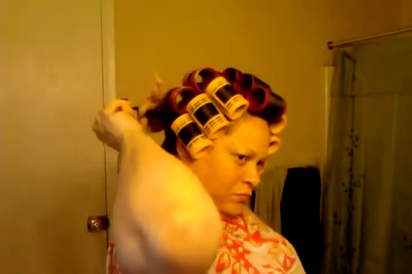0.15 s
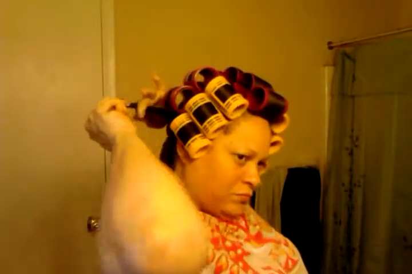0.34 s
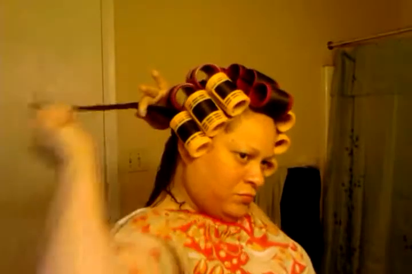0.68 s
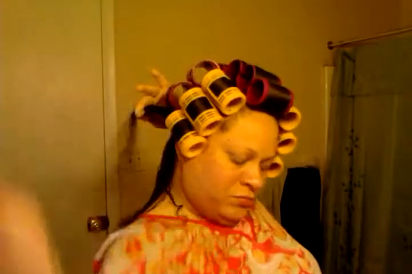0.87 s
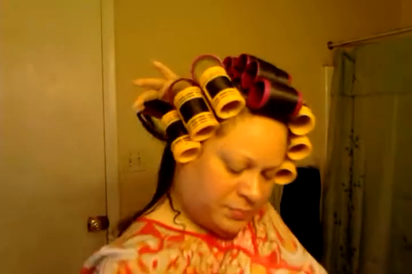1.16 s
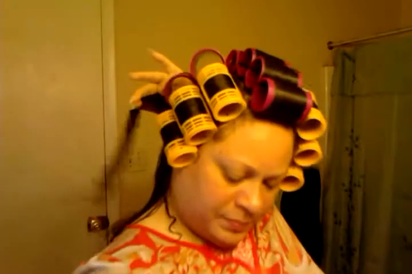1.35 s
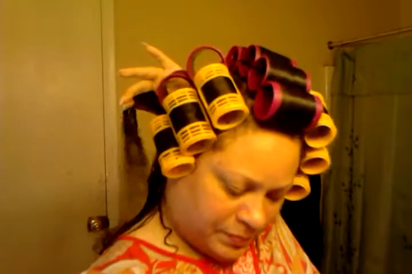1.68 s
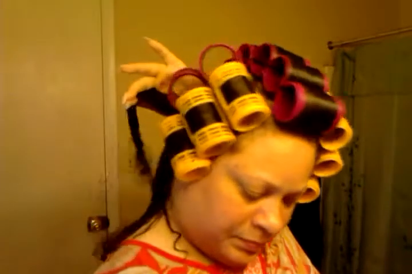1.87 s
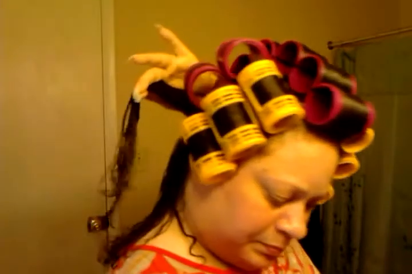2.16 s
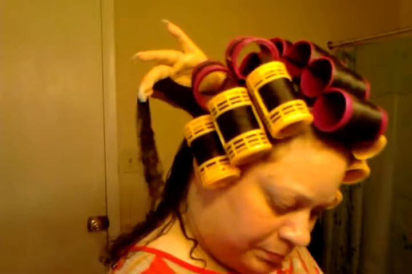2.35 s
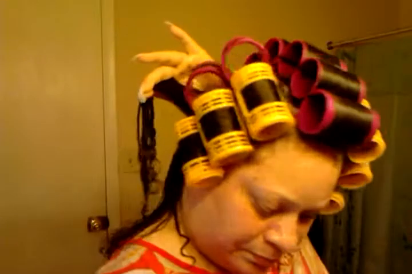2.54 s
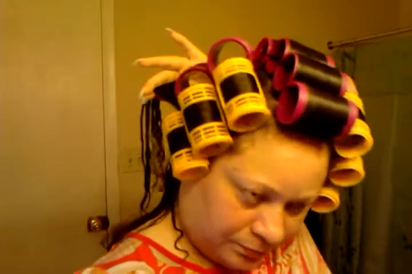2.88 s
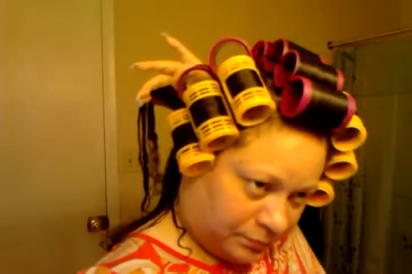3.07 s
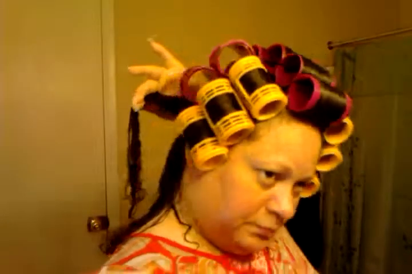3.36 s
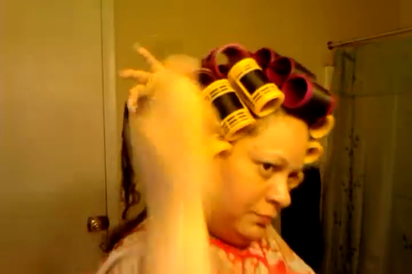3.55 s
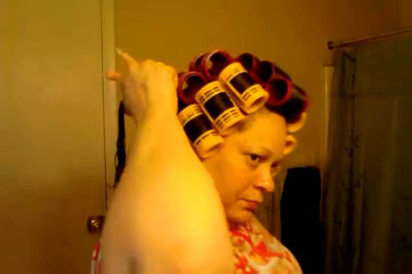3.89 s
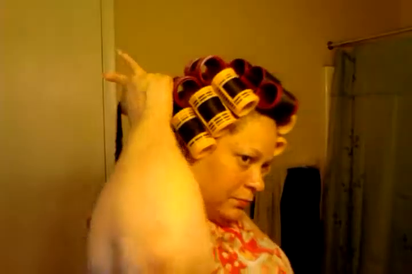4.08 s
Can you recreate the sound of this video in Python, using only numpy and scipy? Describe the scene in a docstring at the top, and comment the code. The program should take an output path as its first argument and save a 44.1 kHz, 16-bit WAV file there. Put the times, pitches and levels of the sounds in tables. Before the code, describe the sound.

A soft recorder hiss runs throughout, with a thin, very high electronic whine and faint rapid ticking. At the start a faint low rumble swells once, and small electric pops sound at about 0.2 and 0.5 seconds. From 1.3 seconds a hand rummages among plastic hair rollers and a comb on a bathroom counter: dry scraping mixed with quick clusters of small, hollow knocks. The clatter is loudest from 1.8 to 2 seconds. A roller squeaks briefly at 2.1 seconds, more rubbing and clicking follows, and another electric pop comes at 2.5 seconds. Softer scattered taps continue, and a barely audible hum comes and goes just after 3 seconds. The rummaging ends with two clusters of light, high clicks at about 3.6 and 3.8 seconds. The tiled room gives the plastic sounds a short, bright reverberation.

```python
"""From the start a recorder hisses, whines thinly and ticks; a low rumble swells once and two pops sound.
After 1.3 s a hand rummages among plastic rollers and a comb on a bathroom counter: friction and bursts
of tiny impacts excite the modes of the plastic, and the tiles add a short bright reverberation.
A roller squeaks at 2.1 s and one more electric pop follows. Near 3 s a faint hum comes and goes,
and the rummaging ends in light, high clicks."""
import sys
import numpy as np
from scipy import signal
from scipy.io import wavfile
from scipy.ndimage import uniform_filter1d

SR = 44100
rng = np.random.default_rng(int(sys.argv[2]) if len(sys.argv) > 2 else 0)


def dump(signal):
    """Clip the signal to [-1, 1] and save it as 16-bit WAV at the path in sys.argv[1]."""
    limited = np.clip(np.atleast_2d(signal).T, -1, 1)
    pcm = np.round(limited * 32767).astype(np.int16)
    wavfile.write(sys.argv[1], SR, pcm)


N = 186366

# Spectral shape of the input-stage noise: f/Hz, relative density/dB
HISS_SPECTRUM = [(12, 8.5), (20, 3.5), (319, -7), (660, -13.5), (849, -12), (1260, -15.5), (1960, -16.5),
                 (7310, -22), (9400, -22), (10200, -17.5), (11800, -23), (12800, -20.5), (16000, -23.5)]
# Drift of the electronic whine: t/s, f/Hz
WHINE_PITCH = [(0, 10196), (.3, 10198), (.6, 10195), (.9, 10196), (1.1, 10191.5), (1.4, 10193),
               (2.7, 10195.5), (2.95, 10190), (3.2, 10196), (3.5, 10198), (4.3, 10197)]
# Electric pops: t/s, signed step height/1, rise constant/s, fall constant/s
ELECTRIC_POPS = [(.2155, 0.0017, .0006, 0.00087), (0.216, 0.037, 0.0011, 0.0067),
                 (.499, -0.03, 0.00014, 0.0004), (2.499, -0.025, 0.00018, 0.00055)]
# Strokes of plastic on plastic: peak t/s, level/dB, rise/s, fall/s, brightness/dB
STROKES = [(1.346, -55, 0.083, 0.057, -3), (1.45, -44.5, 0.11, 0.12, -0.5), (1.79, -37, .03, 0.094, -3),
           (1.885, -47, 0.11, .09, 1), (1.936, -38.5, .012, 0.13, -1.5), (2.183, -42, 0.0051, 0.059, 2.5),
           (2.219, -45.5, 0.077, 0.082, -1), (2.39, -50.5, 0.096, 0.058, 0),
           (2.745, -58.5, 0.011, 0.035, 3.5), (2.955, -57.5, 0.063, 0.037, 2), (3.02, -68.5, 0.053, .05, 6),
           (3.36, -72.5, .04, 0.1, -6), (3.62, -53, .03, 0.041, 8), (3.775, -56, 0.028, 0.067, 7)]
# Modes of the rollers and comb: f/Hz, level/dB, T60/s
PLASTIC_MODES = [(155, -14, 0.073), (219.3, -2, 0.15), (290, -5.5, 0.035), (417.6, 1, 0.17),
                 (790, -18, 0.014), (980, -46, 0.012), (1313, -8, 0.024), (1498, -4, 0.024),
                 (1669, -1.5, 0.031), (2020, 11.5, 0.0098), (2580, 13.5, 0.008), (3220, -8, .015),
                 (3420, -37, 0.011), (4375, -14, 0.016), (5600, 0, 0.0069), (6200, 13, 0.0055),
                 (7060, -23, 0.032), (8850, -17, 0.045), (9250, -13.5, 0.076), (11000, -4, 0.012),
                 (12400, 10.5, 0.019), (13600, 14, .007)]
# Knocks: t/s, crack level/dB, favoured f/Hz, then relative to the crack: ring/dB, body/dB, treble/dB
PLASTIC_KNOCKS = [(1.381, -42.5, 1270, -14, -3.5, -7), (1.397, -32.5, 2580, -17, 2.5, -17),
                  (1.403, -30.5, 6200, -12, -1.5, -3), (1.4192, -26, 2580, -7, -24, -2),
                  (1.438, -28.5, 2580, -7, -29, 1.5), (1.446, -36, 4340, -7, 6.5, -5),
                  (1.483, -32, 1270, -4, -21, 0.5), (1.5, -40, 1250, -3.5, -1, -11),
                  (1.7707, -34, 8850, 3, -2, 11.5), (1.7868, -20.5, 1270, -7, -10, -10),
                  (1.806, -29.5, 1380, -2, -5.5, -9), (1.821, -24.5, 1690, -6, -3.5, -5),
                  (1.871, -24, 12400, -13, -4.5, -4), (1.8897, -28.5, 1730, -7, -4.5, -6),
                  (1.9, -35, 8850, 6.5, -8, 3.5), (1.931, -23, 1360, -12.5, -5.5, -10),
                  (1.958, -36, 1700, -3.5, -15, 5.5), (1.972, -37, 2020, 1.5, -4, -7),
                  (2.18, -43, 5600, 12, -38, 12), (2.2349, -35.5, 980, -16.5, -1.5, 2),
                  (2.3107, -37.5, 11000, -1, 3, 2.5), (2.3322, -30.5, 9250, 1.5, -6.5, 3),
                  (2.344, -50, 2020, 8, 5, 10), (2.352, -39.5, 4300, -5, -2, 8.5),
                  (2.7369, -52.5, 13600, 2, -12, 6), (2.862, -41, 1770, -8.5, -28, -5),
                  (3.0093, -46.5, 11000, -14, -21, 4.5), (3.331, -60, 300, 1, -17, -7),
                  (3.348, -50, 2020, -10, -16, -16), (3.596, -48, 8850, -13, -21, 7),
                  (3.606, -43.5, 6200, 4, -11.5, 10.5), (3.614, -40.5, 6200, -17, -20, 13),
                  (3.626, -42, 12400, -15, -25, 7), (3.635, -46, 8850, -6, -21, 5),
                  (3.749, -49, 11000, -15, -8, 11.5), (3.758, -50.5, 13600, -15, -16, 13.5),
                  (3.765, -53, 9250, 7, -15, 14), (3.777, -56.5, 8850, -10, -7, 20.5),
                  (3.858, -51.5, 8850, -19, -2, 6.5)]
# Reverberation time of the tiled room: f/Hz, T60/s
ROOM_DECAY = [(150, 0.49), (400, 0.59), (800, 0.5), (2000, 0.38), (5500, 0.4), (11000, 0.26), (15000, 0.25)]


def amp(db):
    """Amplitude ratio of a level: tenfold for every 20 dB."""
    return 10 ** (np.asarray(db) / 20)


def unit_rms(x):
    """Normalisation to unit mean power."""
    return x / np.sqrt(np.mean(x ** 2) + 1e-20)


def at_frequency(points, hz):
    """Interpolation on a logarithmic frequency axis."""
    f, value = np.transpose(points)
    return np.interp(np.log(hz + 1), np.log(f + 1), value)


def add(mix, start, sound):
    """Superposition: a sound joins the mix at its start time."""
    part = mix[round(start * SR):][:len(sound)]
    part += sound[:len(part)]


def coloured(x, spectrum):
    """Minimum-phase filtering by a spectrum of f/Hz, gain/dB."""
    log_gain = at_frequency(spectrum, abs(np.fft.fftfreq(4096, 1 / SR))) * np.log(10) / 20
    response = np.exp(np.conj(signal.hilbert(log_gain)))
    return signal.oaconvolve(x, np.fft.ifft(response).real[:2048])[:len(x)]


def hiss(level_db=-63.5):
    """Gaussian noise of the input stage, its spectral density faintly patchy in time and frequency."""
    frames, hz = N // 512 + 5, np.fft.rfftfreq(2048, 1 / SR)
    real, imag, patches = rng.standard_normal((frames, 1025, 3)).T
    patches_db = unit_rms(uniform_filter1d(uniform_filter1d(patches, 16, axis=0), 6, axis=1))
    spectra = (real + 1j * imag) * amp(at_frequency(HISS_SPECTRUM, hz)[:, None] + patches_db)
    return amp(level_db) * unit_rms(signal.istft(spectra, nperseg=2048, noverlap=1536)[1][:N])


def whine(level_db=-65.0, refresh_s=.015893, first_flip_s=.0108):
    """Square-wave modulation: a polarity flip at every refresh splits a high tone into sidebands."""
    t = np.arange(N) / SR
    cycles = np.cumsum(np.interp(t, *np.transpose(WHINE_PITCH))) / SR
    polarity = (-1.) ** np.floor((t - first_flip_s) / refresh_s)
    return amp(level_db) * np.sqrt(2) * polarity * np.sin(2 * np.pi * cycles)


def pop(height, rise_s, fall_s):
    """Step response of the input stage: a quick rise, then exponential relaxation."""
    t = np.arange(2000) / SR
    return height * (1 - np.exp(-t / rise_s)) * np.exp(-t / fall_s)


def ticks(level_db=-47.0, first_s=.0073, period_s=.05172, stray_db=-48.5, strays_per_s=60.):
    """Electric transients: a jittered train of dips and rebounds, Poisson blips and a few pops."""
    pulses = np.zeros(N)
    beats = np.arange(first_s, N / SR, period_s)
    for beat, (late, gap, size) in zip(beats, rng.standard_normal((len(beats), 3))):
        start, height = abs(beat + 0.00303 * late), amp(level_db + 0.5 * size)
        add(pulses, start, pop(-height, 0.00016, 0.00026))
        add(pulses, start + 0.00149 + 0.00026 * gap, pop(1.14 * height, 0.00014, 0.00036))
    strays = rng.standard_normal(N) * (rng.random(N) < strays_per_s / SR)
    pulses += signal.oaconvolve(strays, pop(amp(stray_db), 0.00024, 0.00049))[:N]
    for start, *shape in ELECTRIC_POPS:
        add(pulses, start, pop(*shape))
    offset_blocker = signal.butter(2, 40, "high", fs=SR, output="sos")
    return signal.sosfilt(offset_blocker, pulses)


def rumble(start_s=0.026, length_s=0.37, level_db=-61.5):
    """Amplitude modulation: low band-limited noise swells and fades under a half sine."""
    band = signal.butter(2, [30, 80], "band", fs=SR, output="sos")
    noise = unit_rms(signal.sosfilt(band, rng.standard_normal(N)))
    progress = np.clip((np.arange(N) / SR - start_s) / length_s, 0, 1)
    return amp(level_db) * np.sin(np.pi * progress) * noise


def grit(size, spread_db):
    """Heavy-tailed noise: dense impacts of uneven strength."""
    return unit_rms(rng.standard_normal(size) * amp(spread_db * np.minimum(rng.exponential(1, size), 4)))


def plastic_ring(weights_db):
    """Modal superposition: the impulse response is a sum of damped sines, scaled to unit energy."""
    t = np.arange(4000) / SR
    ring = sum(amp(db + weight - 60 * t / t60) * np.sin(2 * np.pi * hz * t)
               for (hz, db, t60), weight in zip(PLASTIC_MODES, weights_db))
    return ring / np.linalg.norm(ring)


def slide(level_db, rise_s, fall_s, bright_db, swell_db=30, air_db=-4.0, ring_db=-9.0):
    """Sliding friction drives the plastic's modes; brightness trades a dull share for a bright one."""
    t = np.arange(-rise_s, fall_s, 1 / SR)
    stroke_db = level_db - swell_db * np.where(t < 0, -t / rise_s, t / fall_s)
    rub = grit(len(t), spread_db=2.0)
    rub += amp(ring_db) * signal.fftconvolve(rub, plastic_ring(np.zeros(len(PLASTIC_MODES))))[:len(t)]
    dull = coloured(rub, [(150, -15), (500, -2), (1400, 0), (3000, 4), (5000, -8), (12000, 0)])
    bright = coloured(rub, [(800, -37.5), (3500, -4.5), (5200, -4), (9500, 3),
                            (12000, 10.5), (16000, -41)])
    air = coloured(rub, [(6000, -48), (11000, 7), (14000, -21), (16000, 18)])
    treble = unit_rms(bright) + amp(air_db) * unit_rms(air)
    return amp(stroke_db) * (unit_rms(dull) / amp(bright_db) + amp(bright_db) * treble)


def knock(crack_db, hz, ring_db, body_db, treble_db, falloff_db_per_octave=56.0):
    """Impact excitation: a rattle gives a broad crack and rings the modes near hz and the low modes."""
    t = np.arange(6000) / SR
    pitch_ratio = hz / 1520
    rattle_s = 0.005 * pitch_ratio ** -0.39  # smaller, higher pieces settle sooner
    air_db = 1.08 * treble_db + 3.5 * np.log2(pitch_ratio)  # and are stronger in the top octave
    impacts = grit(len(t), spread_db=2.4) * np.exp(-t / rattle_s)
    impacts /= np.linalg.norm(impacts)
    impacts[0] += 0.38  # the sharp first contact
    crack = coloured(impacts, [
        (100, body_db - 38.5), (350, body_db + 2), (700, body_db + 4.5), (1000, body_db + 3),
        (2200, 0.72), (4300, -1.8), (5600, treble_db - 3), (9500, treble_db - 0.5),
        (13000, air_db - 12.5), (16000, air_db - 18)])
    modes_hz = np.transpose(PLASTIC_MODES)[0]
    ring = amp(ring_db) * plastic_ring(-falloff_db_per_octave * abs(np.log2(modes_hz / hz)))
    thud = amp(body_db - 13) * plastic_ring(np.where(modes_hz < 500, 0, -99))
    resonance = signal.fftconvolve(impacts, ring + thud)[:len(t)]
    return amp(crack_db) * np.sqrt(rattle_s * SR) * (crack + resonance)


def tile_reflections():
    """Frequency-dependent absorption: sparse reflections of random sign die at each band's own rate."""
    taps = np.zeros(SR // 2)
    slots = np.arange(120, len(taps) - 12, 12)
    taps[slots + rng.integers(0, 12, len(slots))] = rng.choice([-1., 1.], len(slots))
    hz, t, spectra = signal.stft(taps, SR, nperseg=256)
    decay = amp(-60 * t / at_frequency(ROOM_DECAY, hz)[:, None])
    tail = signal.istft(spectra * decay, SR, nperseg=256)[1]
    return tail / np.linalg.norm(tail)


def bathroom(x, crossfade_hz=7):
    """Reverberation depends on position: as the hand moves, the sound feeds two tails in turn."""
    angle = 2 * np.pi * crossfade_hz * np.arange(N) / SR
    shares = np.sin(angle), np.cos(angle)
    return sum(signal.fftconvolve(x * share, tile_reflections())[:N] for share in shares)


def gliding_tone(length_s, level_db, hz, glide_hz_per_s, wobble_hz):
    """Random frequency modulation of a gliding sine that swells and fades: a squeak or a hum."""
    t = np.arange(0, length_s, 1 / SR)
    wobble = wobble_hz * unit_rms(uniform_filter1d(rng.standard_normal(len(t)), size=120))
    wave = np.sqrt(2) * np.sin(2 * np.pi * np.cumsum(hz + glide_hz_per_s * t + wobble) / SR)
    swell_db = np.interp(t / length_s, [0, .25, 1], [-4.5, 0, -12])
    return amp(level_db + swell_db) * wave * signal.windows.tukey(len(t), .3)


def scene():
    """Superposition of the direct sound, its reverberation and the recorder's own noises."""
    counter = np.zeros(N)
    for start, *strike in PLASTIC_KNOCKS:
        add(counter, start, knock(*strike))
    for peak, level_db, rise_s, fall_s, bright_db in STROKES:
        add(counter, peak - rise_s, slide(level_db, rise_s, fall_s, bright_db))
    roller_squeak = gliding_tone(length_s=.072, level_db=-51, hz=1730, glide_hz_per_s=-1500, wobble_hz=90)
    add(counter, 2.118, roller_squeak)
    faint_hum = gliding_tone(length_s=.28, level_db=-73.5, hz=355, glide_hz_per_s=-55, wobble_hz=8.1)
    add(counter, 3.05, faint_hum)
    radiation = signal.butter(2, 150, "high", fs=SR, output="sos")  # small things radiate little bass
    direct = signal.sosfilt(radiation, counter)
    return (direct + amp(0.5) * bathroom(direct) + hiss() + rumble() + whine() + ticks())[None]


def record(dry, cutoff_hz=15900):
    """Band limiting by a linear-phase low-pass filter."""
    low_pass = signal.firwin(511, cutoff_hz, window=("kaiser", 9), fs=SR)
    return signal.oaconvolve(dry, low_pass[None], "same")


dry = scene()
out = record(dry)
dump(out)
```